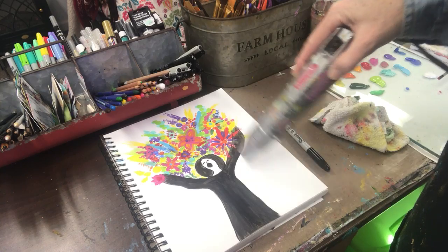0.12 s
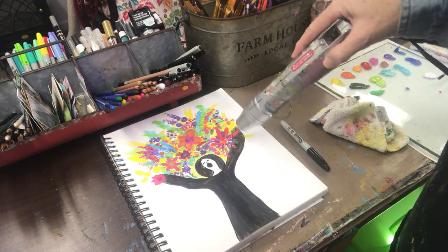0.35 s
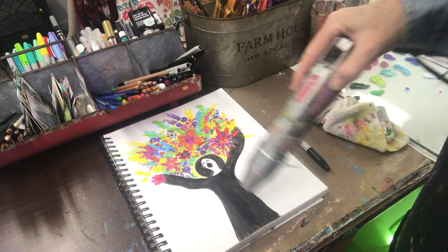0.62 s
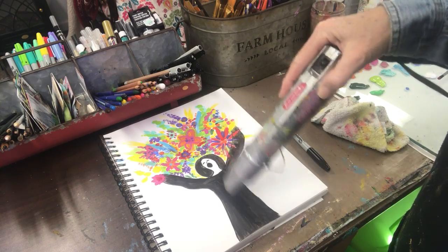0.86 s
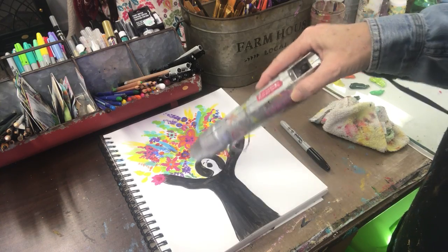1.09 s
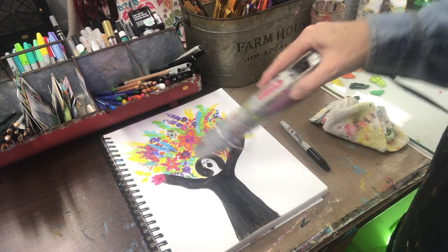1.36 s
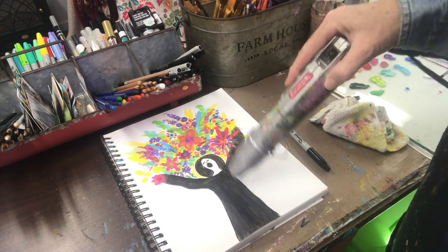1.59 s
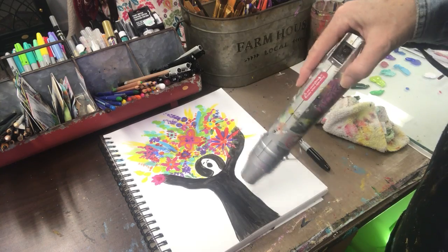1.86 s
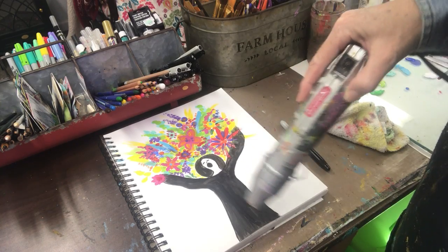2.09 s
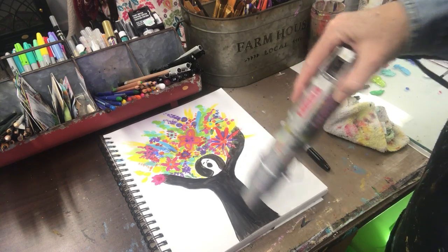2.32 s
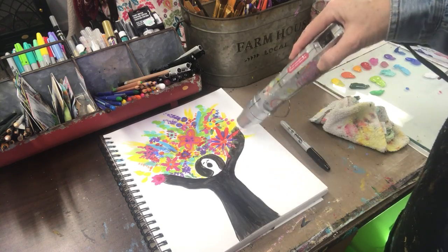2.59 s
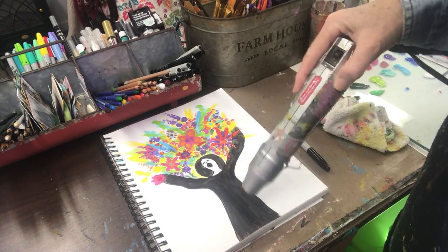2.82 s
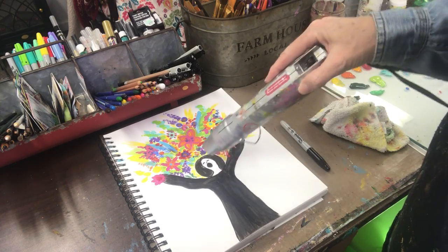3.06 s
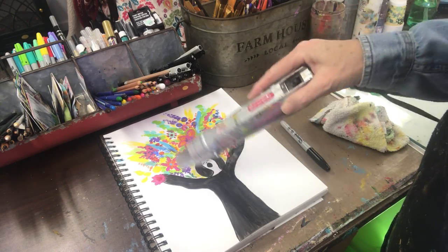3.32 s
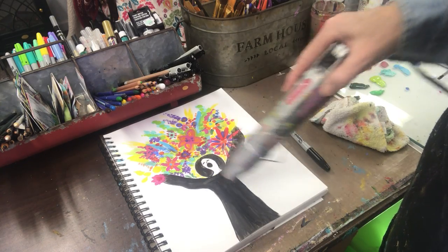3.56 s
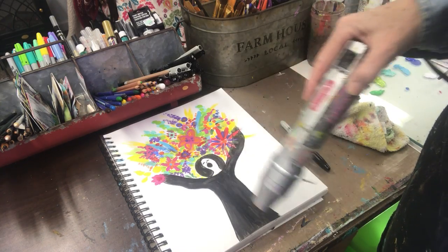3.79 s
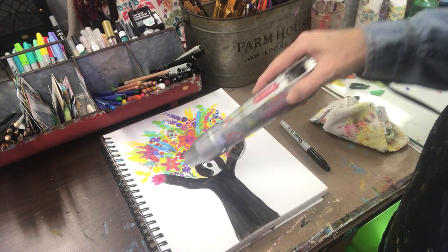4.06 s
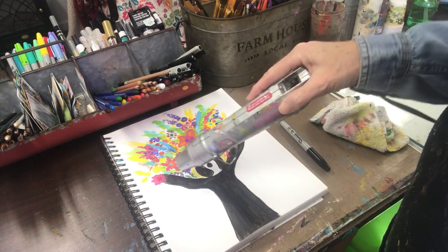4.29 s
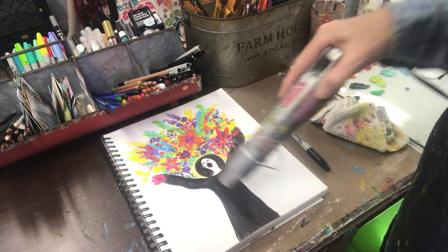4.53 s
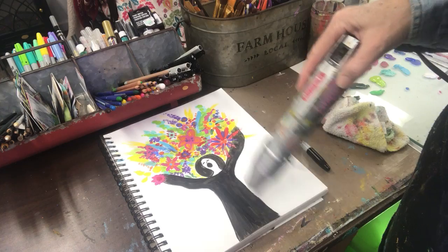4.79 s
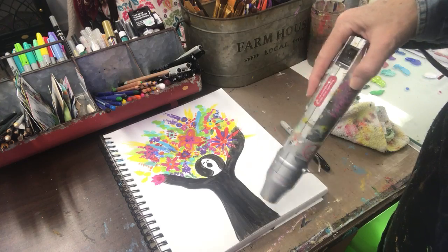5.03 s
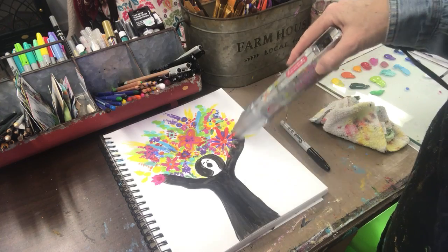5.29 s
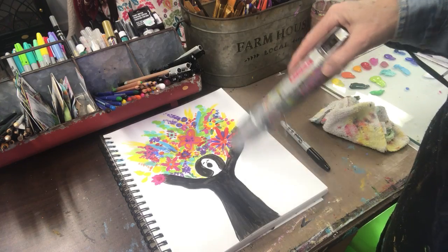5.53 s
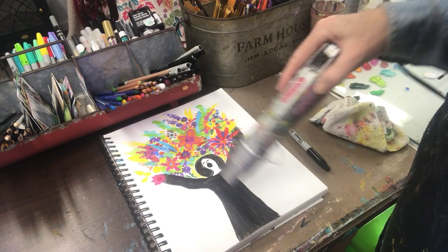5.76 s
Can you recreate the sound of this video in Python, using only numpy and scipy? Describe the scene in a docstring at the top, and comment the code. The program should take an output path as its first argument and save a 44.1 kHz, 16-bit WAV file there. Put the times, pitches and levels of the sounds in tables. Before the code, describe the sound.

A small handheld heat tool whines steadily at high pitch while air rushes through its barrel, the tone wavering as the hand swings it about.

```python
"""A small handheld heat tool is swept over a sketchbook on a desk, indoors, for about six seconds.
From the first moment its fast fan motor whines in multiples of the shaft speed, and air rushes through
the barrel and rings its resonances; faint hums of the room lie behind.
As the hand swings and tilts, tones and barrel resonances swell and fade differently throughout.
The main whine dips deepest near 0.5 s and again near 5.3 s, with shallower dips in between."""
import sys
import numpy as np
from scipy import signal
from scipy.fft import rfft, irfft, next_fast_len
from scipy.io import wavfile
from scipy.ndimage import uniform_filter1d

SR = 44100
rng = np.random.default_rng(int(sys.argv[2]) if len(sys.argv) > 2 else 0)


def decibels_to_gain(level_db):
    """Convert a level in decibels to a linear amplitude gain (20 dB per decade)."""
    exponent = np.asarray(level_db, float) / 20
    return 10 ** exponent


def wav_out(sig):
    """Save sig, one row per channel (or a flat mono array), as 16-bit PCM at SR to the path in sys.argv[1]."""
    wavfile.write(sys.argv[1], SR, np.round(np.clip(np.atleast_2d(sig).T, -1, 1) * 32767).astype(np.int16))


N = 259749  # length in samples
EDGE_HZ = 15750  # nothing is heard above this
RIPPLE_HZ = 120  # rectified mains shakes the motor at this rate


def evened(x):
    """Scales to rms 1."""
    return x / np.sqrt(np.mean(abs(x) ** 2) + 1e-20)


def played(rows, t):
    """Reads every column of a curve table at the times t."""
    s, *columns = np.transpose(rows)
    return [np.interp(t, s, column) for column in columns]


def turning(angle):
    """A unit phasor at each angle, in single precision for speed."""
    wrapped = (angle % (2 * np.pi)).astype(np.float32)
    return np.cos(wrapped) + 1j * np.sin(wrapped)


def waver(rate_hz, t):
    """A random wander of rms 1: sixteen sines of random phase, the fastest at rate_hz."""
    hz = rate_hz * np.geomspace(0.1, 1, 16)[:, None]
    turn = rng.random((16, 1))
    knots = np.linspace(0, t[-1], 1200)
    wander = np.sin(2 * np.pi * (hz * knots + turn)).sum(0)
    return np.interp(t, knots, evened(wander))


def fading(rate_hz, scatter):
    """Direct path plus reflections that turn while the tool moves: a complex gain of mean power about 1."""
    knots = np.arange(0, N + 512, 256)
    hz = rate_hz * rng.uniform(-1, 1, (12, 1))
    turn = rng.random((12, 1))
    paths = np.exp(2j * np.pi * (hz * knots / SR + turn)).sum(0) / np.sqrt(12)
    share = np.clip(scatter, 0, 1)  # part of the power that comes by reflections
    return np.interp(np.arange(N), knots, np.sqrt(1 - share) + np.sqrt(share) * paths)


# how the hand holds the tool, 0 = usual: (time [s], sweep [steps, far -2 to near 2],
# lift off the page [steps, -1 to 4], roll of the wrist [steps, -3 to 3])
HAND_POSE = [(0.0, 1.5, 1, -0.3), (0.15, -1.6, 1, -1.3), (0.25, 0.7, 0.9, -3), (0.42, -0.3, 1.5, -1.5),
             (0.57, 0.4, 0.4, -2.5), (0.67, 1.8, -0.5, -0.6), (0.82, -1.5, -0.5, -1.5),
             (0.97, 0.7, -0.2, -1.6), (1.1, -1, 0, -1), (1.37, -1.8, 0.6, -1), (1.55, 0.3, -0.6, -2),
             (1.77, 0.4, -0.6, 1.4), (2.07, 1.3, -0.4, 0.3), (2.27, 0.7, -1.1, -1.1), (2.5, -0.3, 0.5, -1),
             (2.7, 1.0, 3, -1), (2.85, -0.1, -0.2, -2.2), (2.92, 1.4, 0, -0.8), (3.12, -1.9, 0.6, -0.5),
             (3.55, -0.4, -0.8, -0.5), (3.8, 1.5, 0, -0.2), (3.95, 0.5, -0.8, 1), (4.05, -0.7, -0.2, -1),
             (4.4, -0.9, -0.5, 2), (4.57, 0.2, -0.5, -0.9), (4.87, 1.15, -0.5, -0.5),
             (5.22, 0.9, -0.1, -1.5), (5.35, 0.5, 3.5, -1), (5.7, 0.8, -0.5, -0.9), (5.87, 0, -0.7, 0)]


def hand_pose(t):
    """Sweep, lift and roll of the hand, which glides from one listed pose to the next."""
    return played(HAND_POSE, t)


def posed(rule, t):
    """A level in dB that rises or falls with each part of the hand's pose."""
    mean_db, per_step_db = rule[0], rule[1:4]
    return mean_db + np.dot(per_step_db, hand_pose(t))


# the shaft drifts a little as it runs: (time [s], shaft speed [Hz])
SHAFT_SPEED = [(0.0, 258.75), (0.5, 258.95), (0.95, 258.85), (1.3, 258.4), (1.6, 258.62), (2.45, 258.6),
               (2.65, 259.0), (3.0, 258.7), (3.4, 259.0), (3.85, 259.05), (4.05, 259.4), (4.55, 259.7),
               (4.85, 259.45), (5.1, 259.55), (5.35, 259.35), (5.6, 259.55), (5.89, 259.3)]


def shaft_angle(t):
    """Adds up the shaft speed into an angle; the shaking hand wavers the heard speed."""
    shake_hz = 0.224 * waver(4, t)
    smoothed = uniform_filter1d(uniform_filter1d(rng.standard_normal(N), 1500), 1500)
    wobble_hz = 0.04 * evened(smoothed)
    speed_hz = played(SHAFT_SPEED, t)[0] + shake_hz + wobble_hz
    return 2 * np.pi * np.cumsum(speed_hz) / SR


# the main whine: (mean level [dB], sweep [dB per step], lift [dB per step], roll [dB per step])
BLADE_LEVEL = (-44.5, -1.63, -0.77, 0.03)
# the main whine drops out briefly as the tool crosses a null: (time [s], depth [dB], half width [s])
NULL_DIPS = [(.26, -9, .025), (.49, -18, 0.018), (2.08, -9.5, 0.028), (3.9, -7, 0.023), (5.33, -20, .015),
             (5.4, -6, 0.016)]


def blade_tone(angle, t):
    """The main whine: one cycle each time one of the five fan blades passes."""
    dips_db = 0
    for s, depth_db, half_s in NULL_DIPS:
        dips_db = dips_db + depth_db * np.clip(1 - abs(t - s) / half_s, 0, 1)
    return decibels_to_gain(posed(BLADE_LEVEL, t) + dips_db) * np.exp(5j * angle)


# tones that stand out after the main whine: (multiple of the shaft speed, ...)
STRONG_ORDERS = (4, 6, 7, 8, 9, 10, 17, 18, 25, 26)
# how each of them follows the hand: (mean level [dB], sweep [dB per step], lift [dB per step],
# roll [dB per step], share that fades by chance [0-1])
STRONG_LEVELS = [(-65, 1, 0, 2.5, 0.5), (-58.5, -3.7, -1, -0.8, 0.24), (-54.5, 3, -1.2, 1.1, 0.18),
                 (-55, -2.1, -0.6, 0.1, 0.12), (-64, -3, 0.5, -1.6, 0.14), (-61.5, -2, 0, -2.5, 0.13),
                 (-57, 0, -1.5, -1.5, 0.07), (-66.5, -1.5, 1.3, -0.8, 0.2), (-66, 1.5, -1.5, -1.1, 0.4),
                 (-65, -0.9, 0.2, 2, 0.3)]


def strong_orders(angle, t):
    """Strong multiples of the shaft speed, led by the hand and partly fading by chance."""
    out = 0
    for k, rule in zip(STRONG_ORDERS, STRONG_LEVELS):
        phase = 2 * np.pi * rng.random()
        out = out + decibels_to_gain(posed(rule, t)) * fading(4.5, rule[4]) * turning(k * angle + phase)
    return out


# the fainter tones: (multiple of the shaft speed, mean level [dB] before the treble is beamed)
FAINT_ORDERS = [(1, -65), (11, -73), (12, -69), (13, -72), (14, -70), (15, -65), (16, -67), (19, -71),
                (20, -71), (21, -70), (22, -72), (23, -77), (24, -73), (27, -75), (28, -75), (29, -72),
                (30, -71), (31, -74), (32, -72), (33, -71), (34, -72), (35, -77), (36, -70), (37, -77),
                (38, -76), (39, -76), (40, -81), (41, -81), (42, -83), (43, -82), (44, -73), (45, -79),
                (46, -73), (47, -74), (48, -81), (49, -78), (50, -76), (51, -77), (52, -80), (53, -77),
                (54, -80), (55, -79), (56, -79), (57, -82), (58, -76), (59, -77), (60, -76)]


def faint_orders(angle, ripple):
    """Faint multiples that fade by chance; the high ones carry ripple tones on both sides."""
    side_db = -12.5  # each side tone under its order
    out = 0
    for k, db in FAINT_ORDERS:
        rate_hz = 1.49 + 0.25 * k  # shorter waves cross more nulls in one swing
        gain = fading(rate_hz, min(0.062 * k, 0.85))
        if k > 22:
            gain = gain + 2 * decibels_to_gain(side_db) * ripple.real * fading(rate_hz, 0.69)
        phase = 2 * np.pi * rng.random()
        out = out + decibels_to_gain(db) * gain * turning(k * angle + phase)
    return out


# single tones one ripple away from an order:
# (multiple of the shaft speed, side [-1 below, 1 above], level [dB])
RIPPLE_SIDES = [(5, -1, -69), (5, 1, -66), (8, 1, -73), (11, -1, -70), (12, -1, -76), (14, 1, -72),
                (17, 1, -72), (19, -1, -81), (22, -1, -79)]


def ripple_sides(angle, ripple):
    """The mains ripple shakes the motor and puts a tone just below or above some orders."""
    out = 0
    for k, side, db in RIPPLE_SIDES:
        shift = ripple if side > 0 else ripple.conj()
        out = out + decibels_to_gain(db) * fading(3, 0.57) * shift * turning(k * angle)
    return out


def whine():
    """All motor tones, locked to one shaft angle."""
    t = np.arange(N) / SR
    angle = shaft_angle(t)
    ripple = np.exp(2j * np.pi * RIPPLE_HZ * t)
    tones = blade_tone(angle, t) + strong_orders(angle, t)
    tones = tones + faint_orders(angle, ripple) + ripple_sides(angle, ripple)
    return np.sqrt(2) * tones.real  # so that levels are rms


# broad rush of air; above 7 kHz only its shape counts: (frequency [Hz], level [dB per Hz])
RUSH_SPECTRUM = [(25, -128), (50, -101), (110, -91.5), (230, -86.5), (450, -85.5), (1000, -91.5),
                 (2000, -81.5), (2600, -85.5), (2950, -90.5), (4500, -90.5), (6000, -99), (8000, -99),
                 (10500, -110), (11800, -103), (15800, -104)]


def rush_power(hz):
    """Power per Hz of the air's broad turbulent rush."""
    f, db = np.transpose(RUSH_SPECTRUM)
    return decibels_to_gain(2 * np.interp(np.log(hz + 1), np.log(f), db))


# air resonances that the swing turns toward and away: (centre [Hz], width [Hz])
BARREL_MODES = [(980, 280), (1480, 420), (3230, 310), (3930, 230), (5300, 530)]
# how each follows the hand: (mean level [dB], sweep [dB per step], lift [dB per step], roll [dB per step])
BARREL_LEVELS = [(-60, 5, -2, -1.8), (-52, 0, 1.24, 1.4), (-61, 3.5, -1, 1.8), (-61, -3.5, -3.5, 0),
                 (-65, -1.5, -1.5, 0)]


def barrel_peaks(t):
    """Resonances of the barrel's air that swell and fade with the swinging hand."""
    return [(f, width, posed(rule, t) + 1.1 * waver(4, t))
            for (f, width), rule in zip(BARREL_MODES, BARREL_LEVELS)]


# the two close modes of the whole barrel: (centre [Hz], width [Hz], level against the roar [dB])
WHOLE_BARREL_MODES = [(642.5, 158, -0.5), (703, 160, -1.5)]
# strength of the roar: (mean level [dB], sweep [dB per step], lift [dB per step], roll [dB per step])
ROAR_LEVEL = (-48.5, 0, -1.38, 0.1)


def roar_peaks(t):
    """The whole barrel roars; the jet buffets on the page, so the roar flutters."""
    roar_db = posed(ROAR_LEVEL, t) + 0.9 * waver(40, t)
    glide_hz = -11 * hand_pose(t)[0]  # lower in pitch as the sweep comes near
    return [(f + glide_hz, width, db + roar_db) for f, width, db in WHOLE_BARREL_MODES]


# resonances whose own level ignores the swing; above 7 kHz only their shape counts:
# (centre [Hz], width [Hz], level [dB])
STILL_PEAKS = [(385, 38, -65.5), (2520, 320, -62.5), (5520, 440, -65.5), (6470, 480, -64.5),
               (8100, 4500, -63.5), (13800, 600, -86), (15300, 640, -81)]


def air():
    """Turbulent noise shaped by rush and resonances, in patches that drift as reflections shift."""
    frames = N // 256 + 5
    hz = np.fft.rfftfreq(1024, 1 / SR)[:, None]
    t = np.arange(frames) * 256 / SR
    power = rush_power(hz) * np.ones(frames)
    for f, width, db in barrel_peaks(t) + STILL_PEAKS + roar_peaks(t):
        steep_sided = 1 / (1 + (2 * (hz - f) / width) ** 2) ** 2
        power = power + decibels_to_gain(2 * db) / width * steep_sided
    a, b, patches = rng.standard_normal((frames, 513, 3)).T
    patches = evened(uniform_filter1d(uniform_filter1d(patches, 9, 0), 30, 1))
    depth_db = 0.92 * np.clip(hz / 6000, 0, 1)  # short waves feel the moving reflections most
    noise = a + 1j * b
    shaped = noise * np.sqrt(power) * decibels_to_gain(depth_db * patches)
    unit = signal.istft(noise, nperseg=1024, noverlap=768)[1].std()
    sound = signal.istft(shaped, nperseg=1024, noverlap=768)[1][:N]
    return sound * np.sqrt(SR / 2) / unit  # makes power count per Hz


# hiss and whine beamed from the vents, one row for 7 to 10.7 kHz and one for above:
# (mean level [dB], sweep [dB per step], lift [dB per step], roll [dB per step])
VENT_BEAM = [(-59.5, -0.4, -0.2, .1), (-61.5, 0.01, 0.01, 0.6)]


def beamed(x):
    """Gives the two top bands the strength with which the vents face the listener."""
    hz, t, z = signal.stft(x, SR, nperseg=1024)
    bands_hz = [(7000, 10700), (10700, SR / 2)]
    for (low_hz, high_hz), rule in zip(bands_hz, VENT_BEAM):
        band = (hz >= low_hz) & (hz < high_hz) & (hz < EDGE_HZ)
        rms = np.sqrt(np.mean(abs(z[band]) ** 2) * band.sum() * 4 / 3)  # of the whole band over all time
        z[band] *= decibels_to_gain(posed(rule, t) + 0.2 * waver(3.3, t)) / rms
    return signal.istft(z, SR, nperseg=1024)[1][:N]


# faint tones of the room: (frequency [Hz], level [dB])
ROOM_HUMS = [(120, -90), (331, -70)]


def hums():
    """Faint tones of fixed pitch behind the tool, gently fading by chance."""
    t = np.arange(N) / SR
    out = np.zeros(N)
    for hz, db in ROOM_HUMS:
        tone = fading(1.61, 0.34) * np.exp(2j * np.pi * hz * t)
        out += np.sqrt(2) * decibels_to_gain(db) * tone.real
    return out


def scene():
    """Motor, air and room together, in one channel."""
    tool = beamed(whine() + air())
    return (tool + hums())[None]


def band_limit(x):
    """A steep low-pass at the top of the band."""
    return signal.sosfilt(signal.butter(12, 16020, fs=SR, output="sos"), x)


def record(dry):
    """The microphone cuts deep bass, below about 48 Hz, and the very top."""
    size = next_fast_len(N + SR)
    hz = np.fft.rfftfreq(size, 1 / SR)
    passed = (hz < EDGE_HZ) / np.sqrt(1 + (48 / (hz + 1)) ** 6)
    mix = irfft(rfft(dry, size) * passed, size)[:, :N]
    return band_limit(mix)


dry = scene()
out = record(dry)
wav_out(out)
```